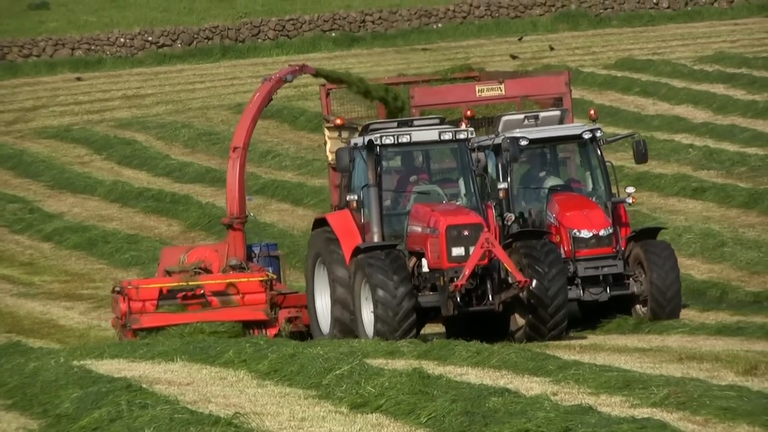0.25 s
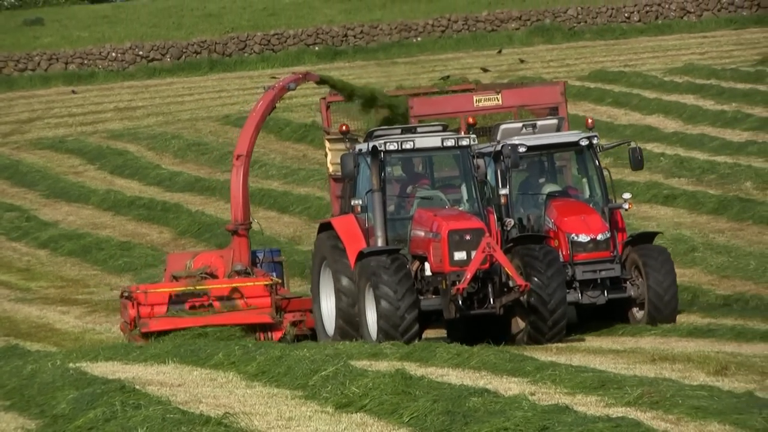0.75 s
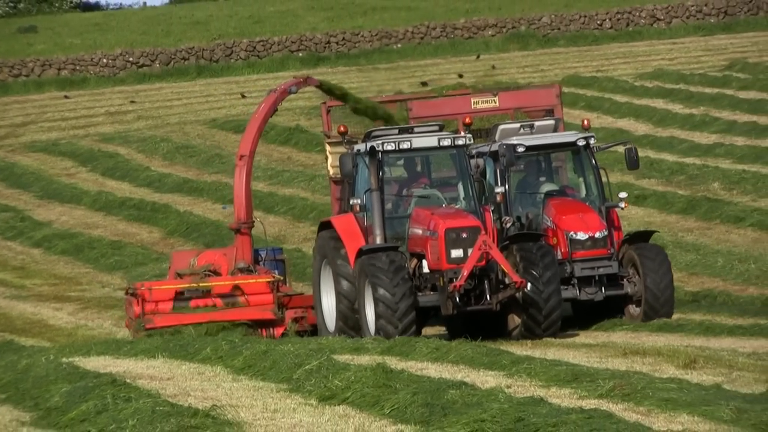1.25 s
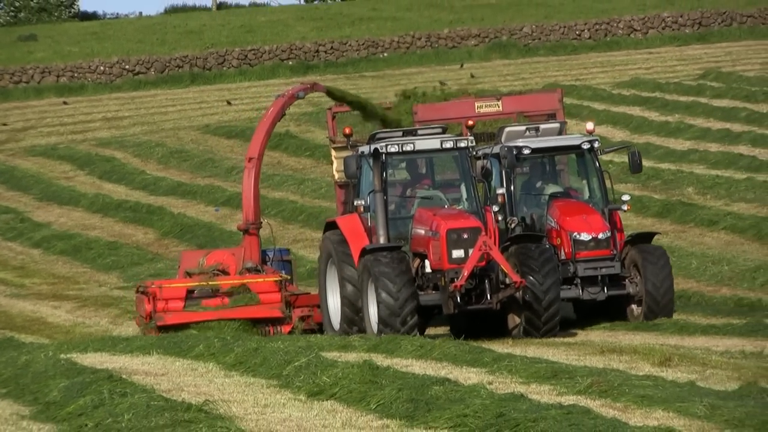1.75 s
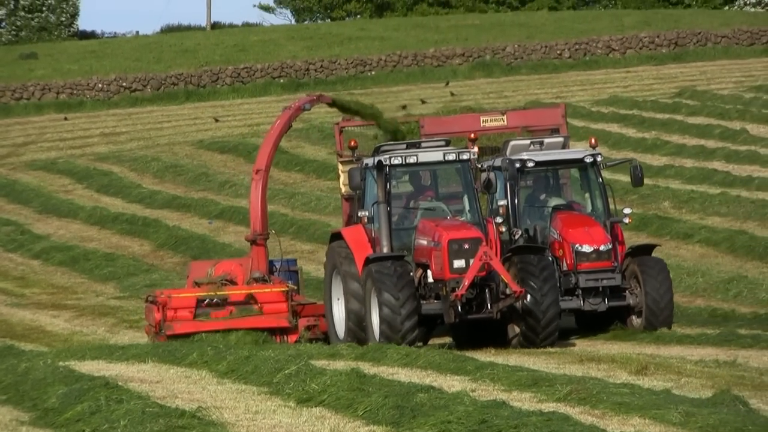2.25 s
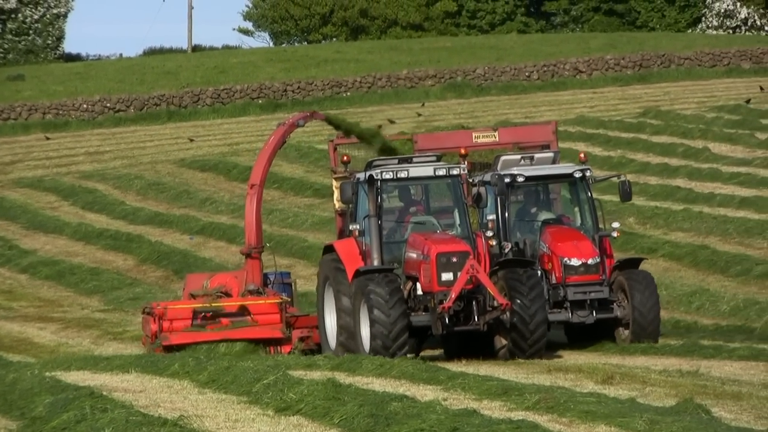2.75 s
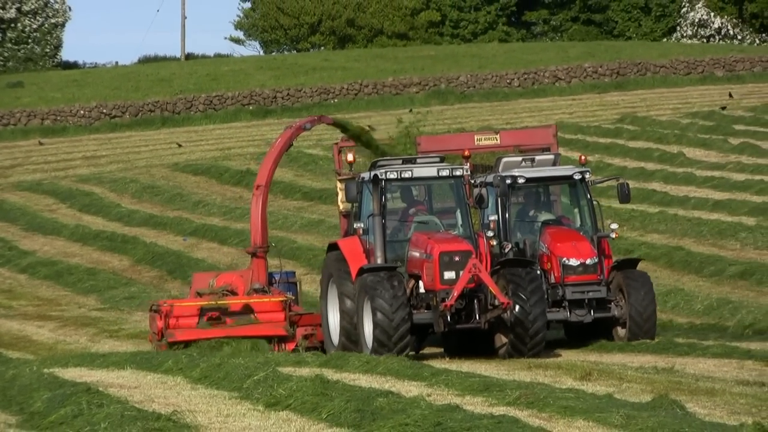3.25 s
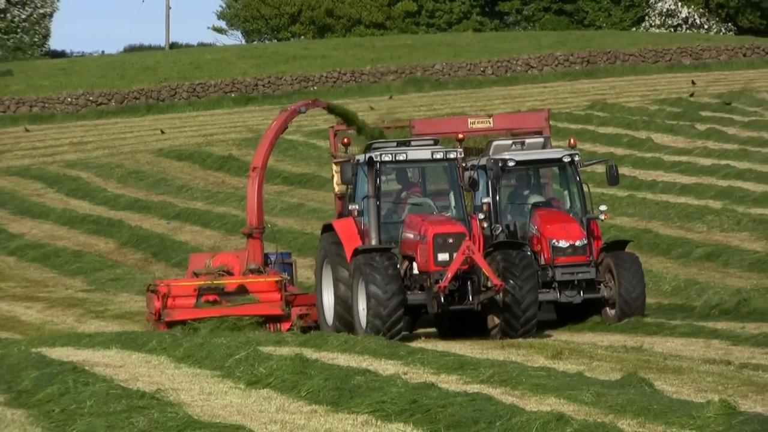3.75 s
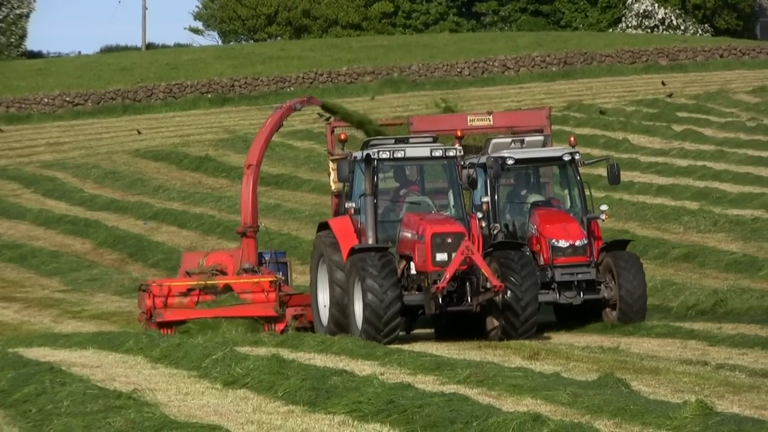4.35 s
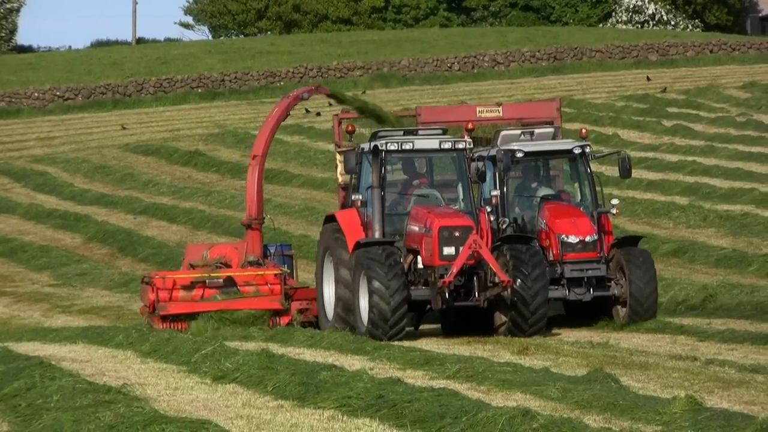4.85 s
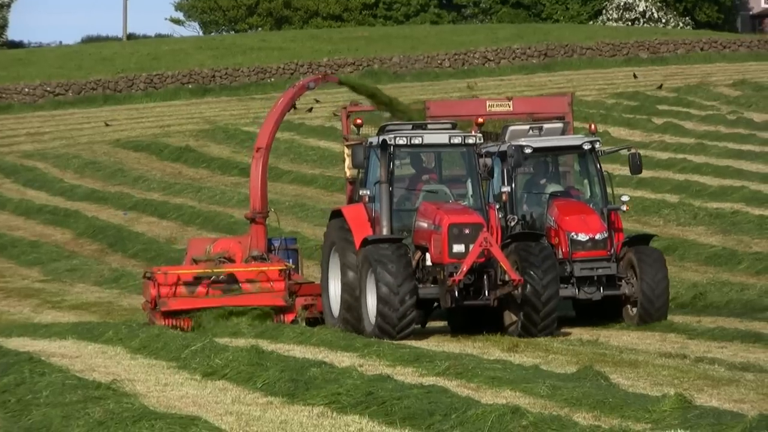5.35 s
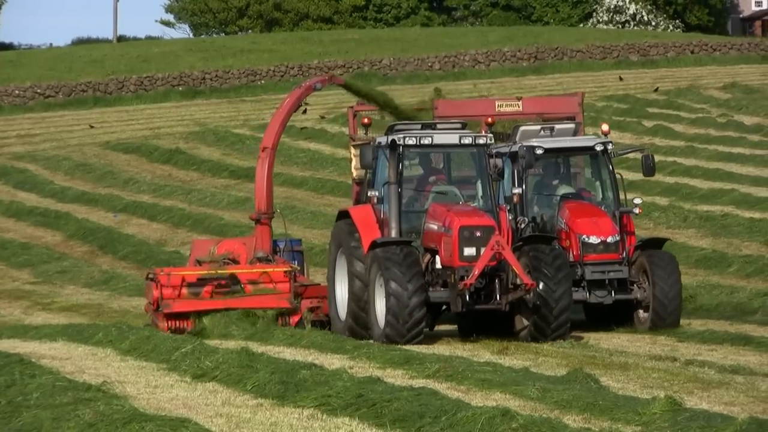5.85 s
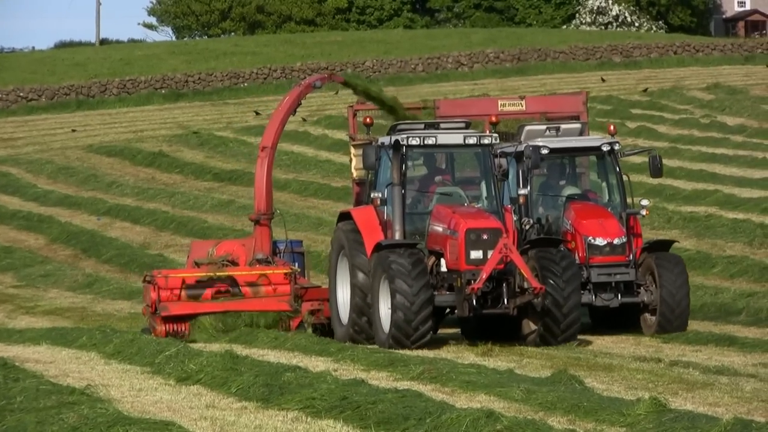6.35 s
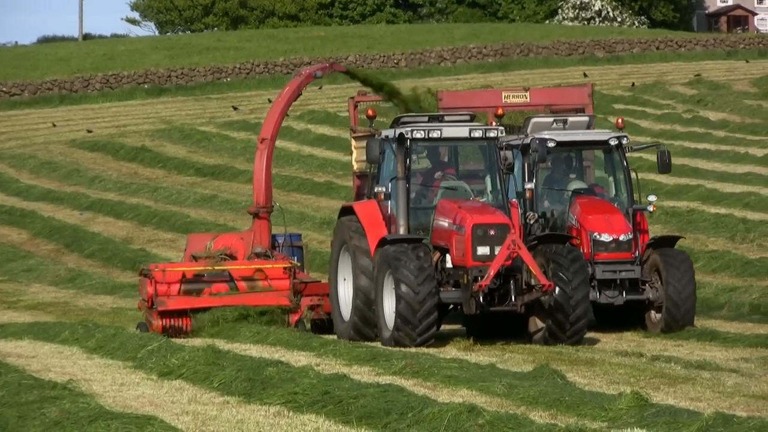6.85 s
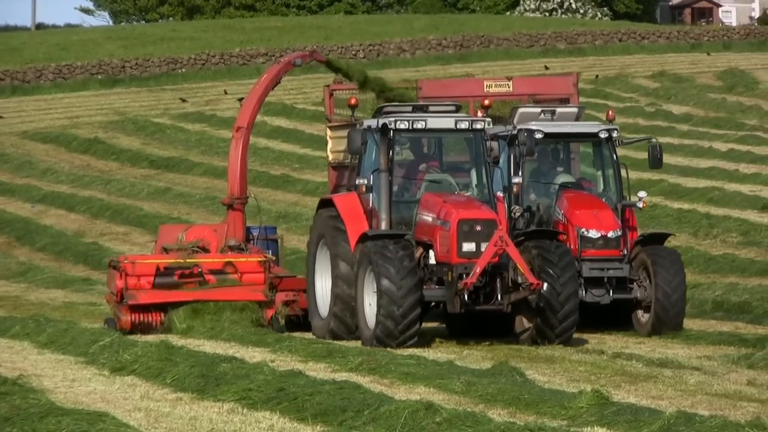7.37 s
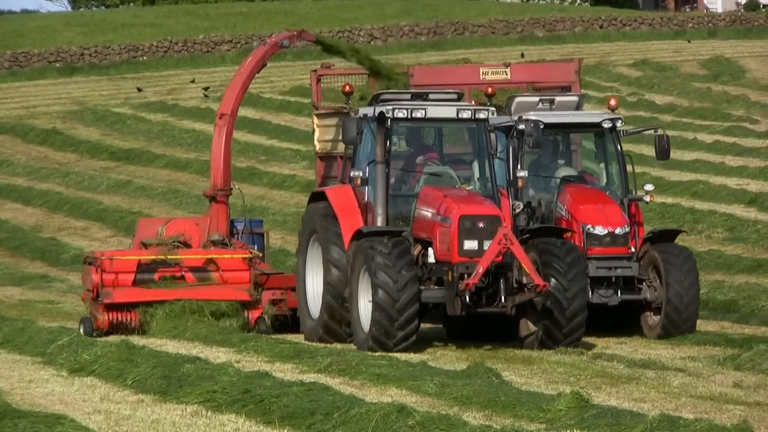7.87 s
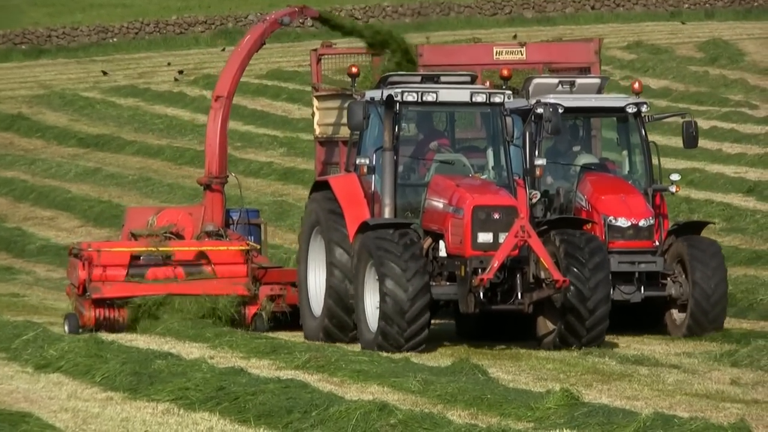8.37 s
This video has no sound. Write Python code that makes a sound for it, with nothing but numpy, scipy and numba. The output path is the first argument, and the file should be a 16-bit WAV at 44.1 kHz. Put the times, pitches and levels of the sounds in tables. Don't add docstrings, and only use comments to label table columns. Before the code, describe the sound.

Loud low tractor drone pulses about once a second against a forage harvester's boom, over fast hard knocking, grass hiss and brief metallic rattles.

```python
import sys
import numpy as np
from scipy import signal
from scipy.fft import rfft, irfft, next_fast_len
from scipy.io import wavfile
from scipy.ndimage import uniform_filter1d
from numba import njit

SR = 44100
rng = np.random.default_rng(int(sys.argv[2]) if len(sys.argv) > 2 else 0)


def invert_db(level):
    return 10 ** (np.asarray(level, dtype=float) / 20)


def pcm_store(signal):
    levels = np.round(np.clip(np.atleast_2d(signal), -1, 1) * 32767)
    wavfile.write(sys.argv[1], SR, levels.astype(np.int16).T)


N = 379701
t = np.arange(N) / SR

# (time [s], firing rate [Hz])
FIRING_RATE = [(0.0, 101.43), (0.35, 105.26), (0.92, 104.49), (1.72, 102.61), (2.15, 104.91),
               (2.33, 102.42), (2.84, 102.98), (3.74, 103.29), (3.86, 103.24), (4.76, 104.49),
               (5.26, 103.76), (5.77, 104.06), (6.01, 105.57), (6.48, 106.16), (7.08, 105.37),
               (7.64, 105.23), (7.9, 107.05), (8.61, 104.46)]
# (time [s], level [dB])
MACHINE_SWELLS = [(0, -1), (.55, 1.05), (1.15, -0.88), (1.6, 1.1), (1.95, 0.19), (2.4, -0.54), (3, 1.2),
                  (3.6, -0.15), (4.15, -1.2), (4.7, 1.3), (5.2, -0.43), (5.85, -0.3), (6.25, 0.87), (6.7, .8),
                  (7.1, -0.82), (7.6, -1.1), (8.1, -0.48), (8.61, 0.098)]
# (multiple of the engine cycle [-], level [dB rms])
EXHAUST_TONES = [(2, -58), (3, -39), (5, -46), (6, -14), (7, -44), (9, -43), (11, -43), (12, -40),
                 (13, -46), (16, -43), (17, -50), (18, -50), (19, -42), (20, -47), (21, -53), (22, -47),
                 (23, -44), (24, -49), (25, -55), (26, -54), (29, -54), (32, -51), (35, -55), (38, -52),
                 (41, -52), (42, -52), (45, -54), (48, -55), (51, -56)]
# (time [s], lag [radians of the engine cycle])
EXHAUST_WANDER = [(.6, -.04), (1.5, .14), (2.3, .02), (3.2, .13), (4, -.03), (4.95, .12), (5.7, -.06),
                  (6.45, -.1), (7.45, .06), (8.3, .12)]
# (multiple of the knife rate [-], level mid-pass [dB rms], growth [dB per s])
KNIFE_TONES = [(1, -42.5, 0.5), (2, -22.5, 1.48), (3, -29, 0.05), (4, -35.5, -0.5), (5, -29.5, -0.07),
               (6, -53.5, 4.1), (7, -69, 1)]
# (time [s], multiple of the knife rate [-], change [dB], half length
# [s])
KNIFE_TONE_SWELLS = [(0.356, 5, -11, 0.18), (0.955, 5, -13, .09), (1.93, 5, -6, 0.2), (2.75, 5, -10.5, 0.14),
                     (3.617, 5, -8.5, 0.068), (4.268, 5, -13.5, 0.066), (4.72, 5, -10, 0.083),
                     (5.585, 5, -13, 0.067), (5.897, 5, -16, 0.049), (6.353, 5, -14.5, 0.09),
                     (6.71, 5, -11, 0.053), (6.9, 5, -5.5, .07), (7.842, 5, -9, 0.33), (8.5, 5, -17, .07),
                     (1.096, 3, -3, 0.25), (1.697, 3, -1, 0.08), (4.49, 3, 0, 0.052), (5.646, 3, -12, .05),
                     (6.15, 3, -2, 0.053), (6.98, 3, -17.5, .25), (7.9, 3, -10, 0.13), (8.55, 3, -13.5, 0.12),
                     (3.95, 2, -3, 0.23), (4.85, 2, -2, 0.15), (2.25, 3, 6, .08), (4.15, 3, 2, 0.12),
                     (1.547, 4, 7, 0.073), (2.203, 5, -7.5, 0.05), (7.252, 5, -6.5, .1)]
# (frequency [Hz], level [dB per Hz])
RUMBLE_COLOUR = [(20, -74.5), (28, -59), (42, -54.5), (75, -57.5), (95, -44), (120, -46), (170, -53.5),
                 (230, -54.5), (280, -64), (400, -67), (600, -80.5)]
THUD_CYLINDERS = [1.3, 1.3, 5.3, 1.1, 1.7, 1]
KNOCK_CYLINDERS = [2.8, 1.4, 5.7, 4.8, 2.2, 1.4]
# (frequency [Hz], level [dB per Hz])
THUD_COLOUR = [(200, -91), (320, -61.5), (403, -66), (450, -66.5), (560, -68), (730, -60.5), (850, -67.5),
               (1020, -59), (1200, -66.5), (1500, -61.5)]
# (frequency [Hz], level [dB per Hz])
KNOCK_COLOUR = [(1000, -66.5), (1400, -58.5), (1620, -56), (2100, -52.5), (2450, -61.5), (2900, -68.5)]
# (frequency [Hz], level [dB per Hz])
BRIGHT_COLOUR = [(2200, -69), (2700, -61.5), (3200, -62), (3900, -76), (5000, -105), (7500, -118),
                 (10000, -100), (13000, -116)]
# (time [s], frequency [Hz])
WHINE_PITCH = [(0, 2120), (.3, 2140), (.9, 2105), (2, 2120), (2.4, 2110), (3, 2125), (5, 2112), (6, 2105),
               (6.6, 2085), (7.5, 2075), (8.61, 2058)]
# (distance from the whine [firing rates], level [dB rms])
WHINE_SIDE_TONES = [(-2, -44), (-1, -48), (0, -40), (1, -41.5), (2, -49)]
# (frequency [Hz], level [dB per Hz])
GRASS_COLOUR = [(2000, -105), (3000, -69.5), (4200, -75.5), (5500, -82.5), (7000, -89.5), (8000, -88.5),
                (10000, -96), (12500, -105), (15000, -119), (16000, -131)]
# (frequency [Hz], level [dB rms])
SQUEAL_TONES = [(7730, -72), (7970, -69), (12100, -86), (13420, -83)]
# (time [s], peak level [dB], ring frequency [Hz], time to fall 60 dB [s])
LINK_RATTLES = [(0.496, -39, 5500, 0.092), (0.516, -42, 5540, 0.13), (.55, -44, 5540, 0.13),
                (.59, -48, 6000, .1), (.70, -49, 6000, .1), (.782, -40, 5380, .1), (.825, -42, 5150, .1),
                (.875, -44, 5840, 0.12), (.915, -46, 4940, .08), (1.37, -37, 5000, 0.15),
                (1.408, -45, 5200, 0.11), (1.445, -48, 5270, .14), (1.48, -50, 5200, .12),
                (1.565, -49, 5100, 0.1), (1.59, -45, 5300, .1), (1.64, -48, 5000, .1),
                (1.671, -41, 5200, .1)]
# (time of the peak [s], level [dB], rise [s], fall
# [s])
FLUNG_CLUMPS = [
    (1.79, -52, .004, 0.0067),
    (5.142, -48.5, 0.0034, 0.031),
    (5.69, -61, 0.0086, 0.02),
    (6.523, -47, .002, 0.022),
    (8.335, -48, 0.015, 0.028),
    (8.364, -44.5, .0015, 0.021),
    (8.42, -56.5, 0.024, 0.07),
    (8.609, -41, 0.00079, .002),
]
# (frequency [Hz], level [dB per Hz])
CLUMP_COLOUR = [(2500, -27), (4500, 8.5), (8000, 1.5), (11000, -1.5), (14500, -21.5), (16000, -41)]


def curves(table):
    s, *columns = np.transpose(table)
    return [np.interp(t, s, column) for column in columns]


def colour(x, points):
    size = next_fast_len(N + 8192)
    hz, db = np.transpose(points)
    log_hz = np.log(np.arange(size // 2 + 1) * SR / size + 1)
    gain = invert_db(np.interp(log_hz, np.log(hz), db, left=-200, right=-200))
    return irfft(rfft(x, size) * gain * np.sqrt(SR / 2), size)[:N]


def walk(rate):
    hold = int(SR / rate)
    levels = np.repeat(rng.standard_normal(N // hold + 1), hold)
    return 1.4 * uniform_filter1d(uniform_filter1d(levels, hold), hold)[:N]


def bursts(firings, cylinder_db, late, depth_db, scatter_db):
    count, part = np.divmod(firings - late + 6, 1)
    count = count.astype(int)
    scatter = scatter_db * rng.standard_normal(N // 300)[count]
    peak_db = depth_db + np.take(cylinder_db, count % 6) + scatter
    gate = invert_db(peak_db * np.sin(np.pi * part) ** 2)
    return gate * rng.standard_normal(N) / np.sqrt(np.mean(gate ** 2))


def bump(middle, half):
    return np.exp(-((t - middle) / half) ** 2)


def facing(db, turn_db, db_per_s):
    turn_s, half_s = 2.58, 1.1
    return invert_db(db + turn_db * np.tanh((t - turn_s) / half_s) + db_per_s * (t - turn_s))


def exhaust(firings):
    cycle = 2 * np.pi * firings / 6
    lag = curves(EXHAUST_WANDER)[0]
    tones = 0
    for k, db in EXHAUST_TONES:
        angle = k * (cycle - (k < 8) * lag + np.pi / 3)
        swing = np.sign(8 - k)
        tones = tones + invert_db(db + 0.6 * walk(8)) * swing * np.cos(angle)
    return np.sqrt(2) * invert_db(0.23 * (t - 9.0)) * tones


def knife_drum(firings):
    knives_per_cycle, start_angle = 2.966, 2.24
    drum = knives_per_cycle * 2 * np.pi * firings / 6 + start_angle
    tones = 0
    for k, db, db_per_s in KNIFE_TONES:
        shaky = k > 2
        swell_db = sum(change * bump(s, half) for s, j, change, half in KNIFE_TONE_SWELLS if round(j) == round(k))
        waver_db = (1.28 + 0.092 * t if shaky else 0.4) * walk(8)
        level = invert_db(db + db_per_s * (t - 4.5) + swell_db + waver_db)
        tones = tones + level * np.cos(k * drum + shaky * 0.2 * walk(10))
    return -np.sqrt(2) * tones


def rumble():
    return colour(invert_db(1.2 * walk(6)) * rng.standard_normal(N), RUMBLE_COLOUR)


def block(firings):
    thuds = bursts(firings, THUD_CYLINDERS, late=-0.46, depth_db=2.0, scatter_db=0.5)
    thud = invert_db(0.54 * (t - 4.5)) * colour(thuds, THUD_COLOUR)
    blows = bursts(firings, KNOCK_CYLINDERS, late=-0.38, depth_db=3.5, scatter_db=1.45)
    knock = facing(db=-2.3, turn_db=0.53, db_per_s=-0.11) * colour(blows, KNOCK_COLOUR)
    bright = facing(db=-0.2, turn_db=-3.5, db_per_s=-0.14) * colour(blows, BRIGHT_COLOUR)
    return thud + knock + bright


def whine(firings):
    angle = 2 * np.pi * np.cumsum(curves(WHINE_PITCH)[0] + 1.5 * walk(4)) / SR
    tones = 0
    for k, db in WHINE_SIDE_TONES:
        tones = tones + invert_db(db + 1.8 * walk(5)) * np.cos(angle + 2 * np.pi * k * firings)
    return np.sqrt(2) * tones


def grass(firings):
    grains = invert_db(1.2 * rng.exponential(size=N // 40 + 1)).repeat(40)[:N]
    puffs = bursts(firings, KNOCK_CYLINDERS, late=-0.36, depth_db=-2.0, scatter_db=1.0) * grains / 1.1
    flow = invert_db(0.23 * walk(14) + 1 * bump(5.5, 1.38))
    return facing(db=-2.7, turn_db=1.76, db_per_s=0.25) * flow * colour(puffs, GRASS_COLOUR)


def squeals():
    singing = invert_db(9 * bump(3.7, 1.5) - 4)
    out = np.zeros(N)
    for hz, db in SQUEAL_TONES:
        out += singing * invert_db(db + 3 * walk(12)) * walk(120) * np.cos(2 * np.pi * hz * t)
    return out


def rattles():
    out = np.zeros(N)
    ring = t[:SR // 5]
    for s, db, hz, t60 in LINK_RATTLES:
        off, start = rng.standard_normal((2, 40))
        pitches = hz * np.exp(0.16 * off)
        waves = np.sin(2 * np.pi * np.outer(pitches, ring) + 3 * start[:, None])
        modes = invert_db(-3 * off ** 2) @ waves
        fade = np.tanh(ring / 0.004) * np.exp(-np.log(1000) * ring / t60)
        out[int(s * SR):][:len(ring)] += invert_db(db - 9.5) * modes * fade
    return out


def clumps():
    flung = 0
    for s, db, rise, fall in FLUNG_CLUMPS:
        flung = flung + invert_db(db) * np.exp(-np.abs(t - s) / np.where(t < s, rise, fall))
    return colour(flung * rng.standard_normal(N), CLUMP_COLOUR) * invert_db(-35)


def scene():
    firings = np.cumsum(curves(FIRING_RATE)[0]) / SR
    booms = exhaust(firings) + knife_drum(firings) + rumble()
    engine = block(firings) + whine(firings)
    harvester = grass(firings) + squeals() + rattles() + clumps()
    mono = booms + invert_db(curves(MACHINE_SWELLS)[0]) * (engine + harvester)
    return np.array([mono, mono])


@njit
def follow(x, attack, release):
    y, e = np.empty(len(x)), np.mean(x)
    for i in range(len(x)):
        e += (x[i] - e) * (attack if x[i] > e else release)
        y[i] = e
    return y


def roll_off(x):
    return signal.sosfilt(signal.butter(12, 15140, fs=SR, output="sos"), x)


def record(dry):
    envelope = follow(np.abs(dry[0]), 1 / (0.043 * SR), 1 / (0.06 * SR))
    loud = uniform_filter1d(envelope, size=SR // 104)
    fade_in = np.minimum(t / 0.0019, 1)
    even = dry * (0.19 / loud) ** 0.61 * fade_in
    left = signal.lfilter(*signal.butter(1, 40, "high", fs=SR), even[0])
    right = signal.lfilter(*signal.butter(1, 4, "high", fs=SR), even[1])
    hiss = invert_db(-87.0) * rng.standard_normal((2, N))
    return roll_off(np.array([left, right]) + hiss)


dry = scene()
out = record(dry)
pcm_store(out)
```